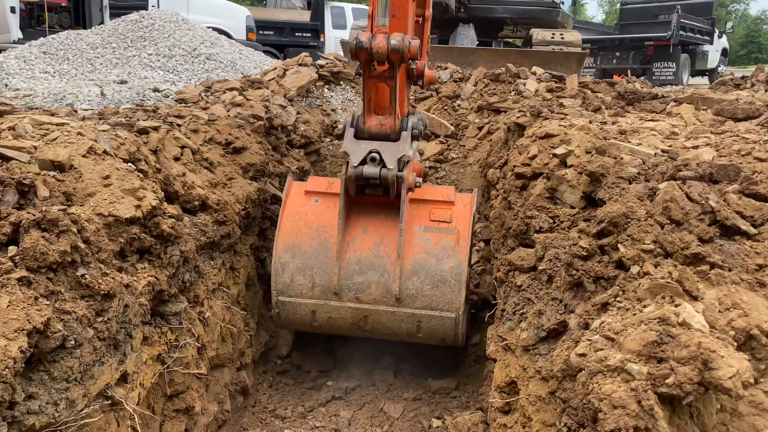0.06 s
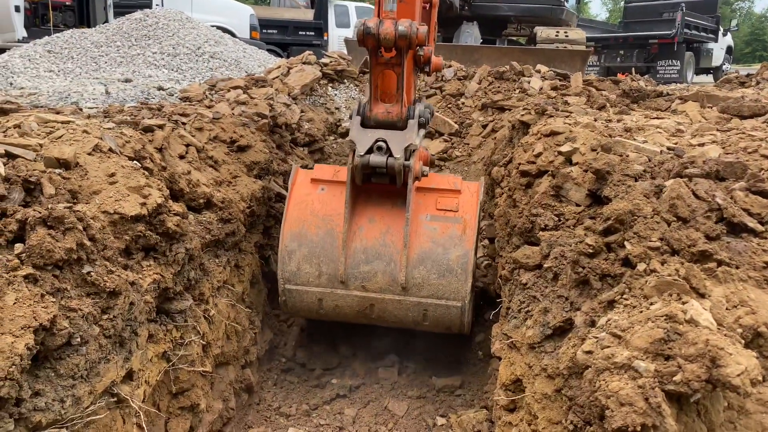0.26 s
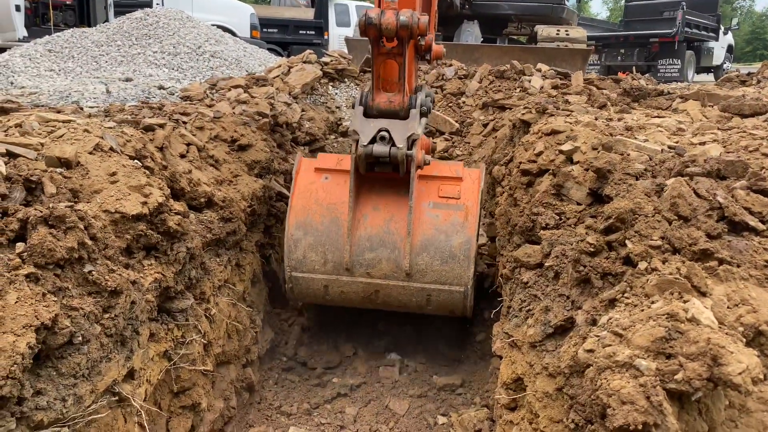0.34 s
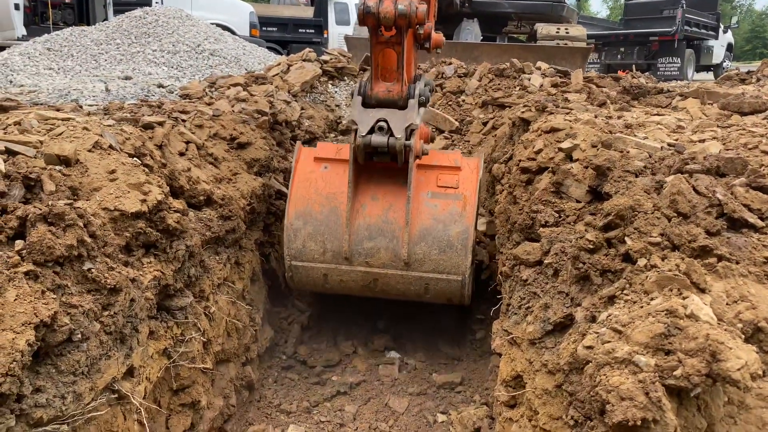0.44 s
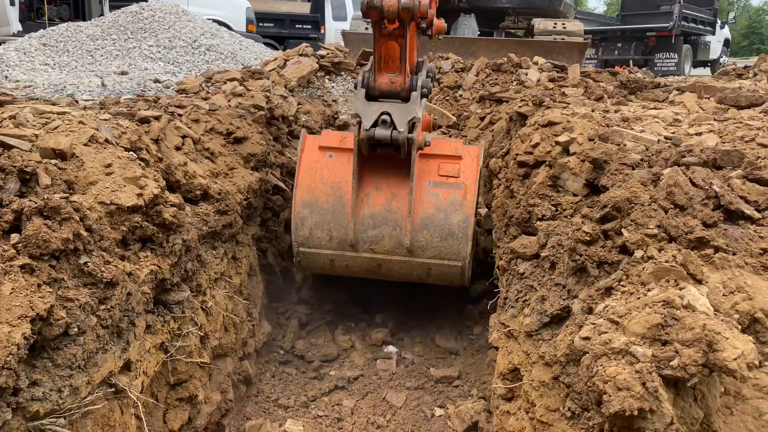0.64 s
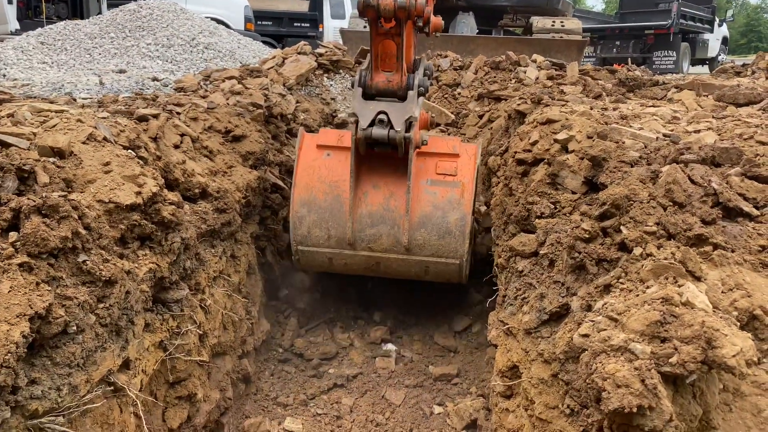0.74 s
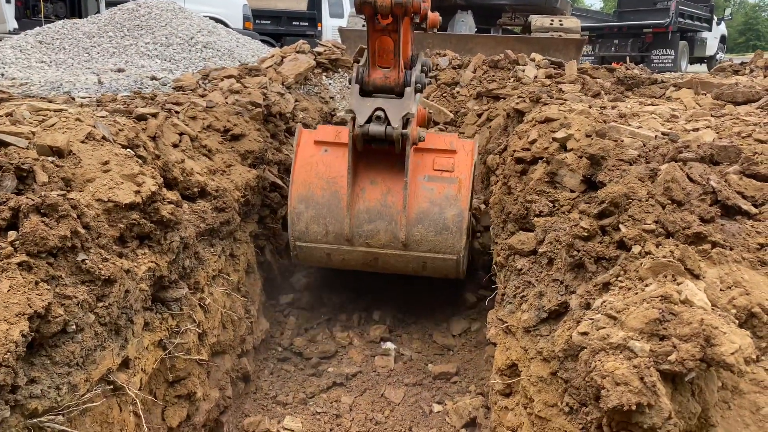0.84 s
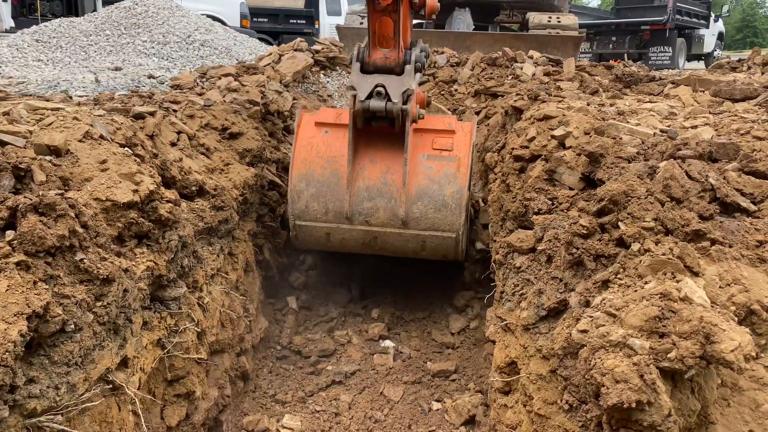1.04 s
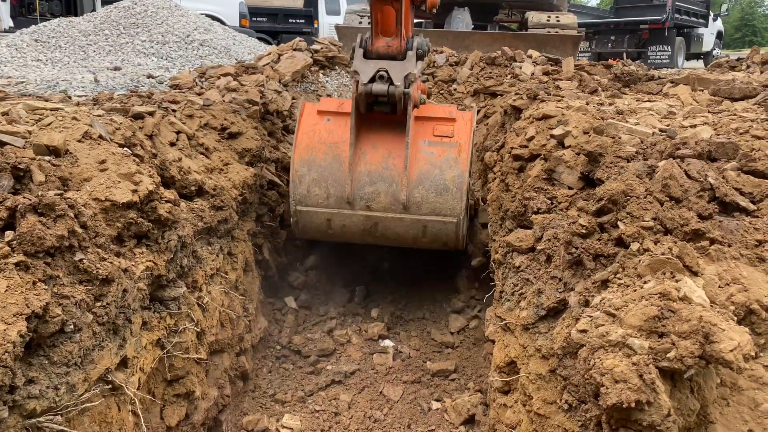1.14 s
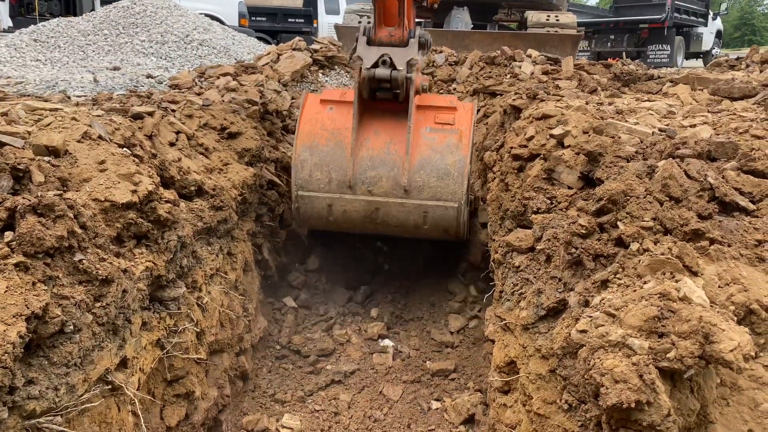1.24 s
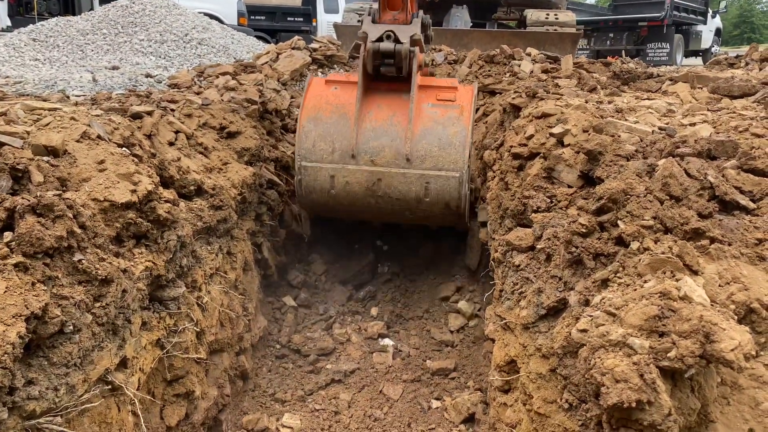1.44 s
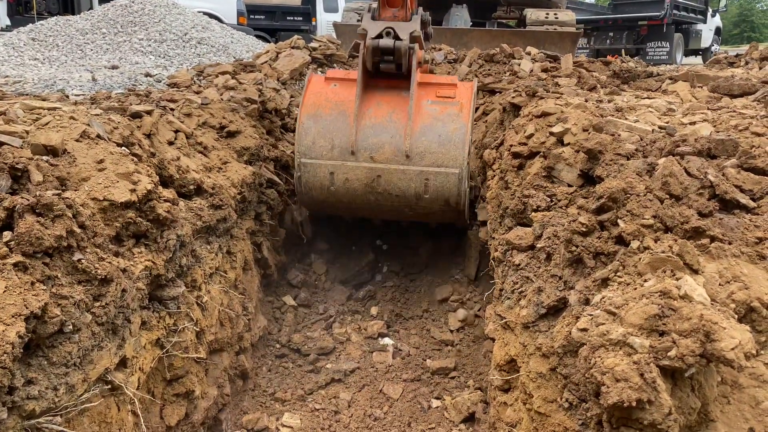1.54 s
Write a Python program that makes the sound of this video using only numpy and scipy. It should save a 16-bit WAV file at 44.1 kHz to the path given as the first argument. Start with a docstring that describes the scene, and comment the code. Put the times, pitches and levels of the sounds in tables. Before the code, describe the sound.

A steel digger bucket grinds briefly against rocky earth over a low engine rumble.

```python
"""Excavator bucket in a rocky trench

A steel bucket lifts along the trench wall. Stones crack against it in showers of tiny fractures,
then it grinds over rock for a third of a second and rings. Soft clods thud down around it, and a
few late knocks follow. Behind it the diesel runs steadily: a low firing tone, rumble and clatter,
a hollow drone and a thin hydraulic whine."""
import sys
import numpy as np
from scipy import signal
from scipy.fft import rfft, irfft, next_fast_len
from scipy.io import wavfile

SR = 44100
rng = np.random.default_rng(int(sys.argv[2]) if len(sys.argv) > 2 else 0)


def generate_wav(sig):
    """Save sig (samples, or channels by samples) to the path in sys.argv[1] as 16-bit PCM at SR."""
    pcm = np.round(np.clip(np.atleast_2d(sig).T, -1, 1) * 32767).astype(np.int16)
    wavfile.write(sys.argv[1], SR, pcm)


N = 70560
TIME = np.arange(N) / SR

# Stone hits. Each row: start in seconds, decay in seconds, share landing on steel from 0 to 1,
# then thud, body, knock, crack and grit in dB per octave.
STONE_HITS = [(.152, 0.0055, 0.1, -20, -34, -23, -26, -20), (.23, 0.01, .05, -23.5, -27, -24, -16, -30),
              (.269, 0.022, 0.04, -36, -23.5, -23.5, -23, -25),
              (0.288, 0.016, 0, -17, -25, -20.5, -12.5, -32.5),
              (0.344, 0.007, 0.07, -14, -13.5, -38, -39, -48),
              (0.363, 0.0079, 0.95, -14.5, -27, -12.5, -20.5, -44),
              (.392, 0.011, 1.0, -20, -15.5, -13.5, -36, -15.5),
              (.438, 0.021, 0.97, -39, -19, -20, -20, -33), (0.463, 0.011, 0.87, -29, -21, -19.5, -29, -27),
              (0.533, 0.011, 0.97, -26, -18.5, -29, -28.5, -39),
              (.551, 0.012, 0, -18, -64, -13, -30.5, -41), (0.598, 0.011, .2, -23.5, -54, -18.5, -35, -50),
              (.71, 0.0074, 0.3, -41, -40, -32.5, -39, -50),
              (1.304, 0.008, 0.15, -27, -29.5, -54, -74, -61),
              (1.523, 0.017, 0, -37.5, -33, -38.5, -42, -45),
              (1.57, 0.0055, 0, -31.5, -33.5, -30.5, -32, -33)]
# Where thud, body, knock, crack and grit sit, in Hz.
HIT_BANDS_HZ = [130, 420, 1250, 2500, 6500]
# The ring of steel and of rock. Each row: pitch in Hz, width in Hz, relative level in dB.
BUCKET_MODES = [(217.4, 12.4, -13.5), (403.7, 18.7, -5.5), (427.5, 13, -11.5), (506.5, 28, -12.5),
                (728, 7.9, -8), (888, 9.6, -14.5), (949.5, 21.5, -2), (1217, 18, -13), (1396, 54, -15),
                (1551, 36, -10), (1924, 36, -34), (2454, 25, -11.5), (4926, 170, -6.5), (6380, 48, -7),
                (7460, 41, -11.5)]
ROCK_MODES = [(1096, 22, -15), (1750, 13, -10.5), (2360, 28, -11), (2485, 27, -14.5)]
# The scrape's swell. Each row: time in seconds, then low grind, mid rasp and high grit in dB.
SCRAPE_ENVELOPE = [(.14, -62, -44.5, -58), (0.169, -25, -47, -39), (.22, -32, -49, -64),
                   (0.278, -22.5, -18.5, -31), (.352, -22.5, -29.5, -31.5), (.4, -20, -23, -36),
                   (0.483, -25.5, -23, -31), (0.559, -23, -32.5, -58.5), (.62, -36, -41.5, -47),
                   (.67, -42, -63, -72), (.76, -43.5, -60, -58)]
# Tone of the scrape's layers and of a clod. Each row: frequency in Hz, relative dB per octave.
GRIND_TONE = [(40, -37.5), (75, 0.5), (115, 5), (160, -22.5), (250, 2), (420, -2.5), (600, -21.5),
              (1000, -47.5)]
RASP_TONE = [(400, -36), (700, -0.5), (1000, -2.5), (1600, 1), (2500, 3), (3500, -21), (6000, -51)]
GRIT_TONE = [(2000, -24), (3600, -2), (5000, -8), (7000, 9), (8500, -7.5), (10500, -1.5), (12000, -57),
             (15000, -34)]
CLOD_TONE = [(50, -22.5), (110, -1), (200, 1), (330, 0), (480, -18.5), (1000, -10.5), (3000, -14.5),
             (10000, -43)]
# Clods landing. Each row: start in seconds, level in dB.
CLOD_FALLS = [(.008, -32), (0.063, -36), (0.151, -25.5), (0.173, -29.5), (.195, -26.5), (0.574, -27),
              (.628, -34.5), (0.724, -36), (0.786, -37.5), (.86, -33), (0.927, -28.5), (.962, -32.5),
              (1.088, -36.5), (1.173, -33.5), (1.228, -39)]
# Gaps between the resonances of bucket and trench. Each row: frequency in Hz, gain in dB.
HOLLOWS_EQ = [(130, 0), (160, -5.5), (210, 0.5), (520, -2), (620, -4.5), (710, 0), (790, -1.5), (930, 0),
              (1190, 2), (1280, -6), (1400, 3), (2000, -2), (2130, -3), (2300, -0.5)]
# Stereo images. Each row: frequency in Hz, left minus right in dB, side against mid in dB.
BUCKET_IMAGE = [(100, 1, -19), (223, 3.5, -21), (400, 0.5, -28), (744, 5.5, -13.5), (1390, 5, -6.5),
                (2560, 0.5, -10), (3900, 2.5, -2.5), (4630, 9, 1), (6960, 8.5, -7), (11400, -8, -3.5)]
ENGINE_IMAGE = [(30, 0.5, -0.5), (106, -0.5, 6), (330, -1.5, -4), (880, 3, -2.5), (1850, 6, 4.5),
                (5000, 5.5, -3.5), (9700, 0.5, -4)]
# Level rides of the firing tone and the drone. Each row: time in seconds, level in dB.
FIRING_ENVELOPE = [(0, -31), (.15, -32), (.45, -35.5), (.62, -48), (.7, -32), (.86, -34.5), (.92, -36),
                   (1.01, -37), (1.08, -34.5), (1.35, -30), (1.6, -33.5)]
DRONE_ENVELOPE = [(0, -33.5), (.12, -46.5), (.7, -38.5), (.86, -35.5), (.97, -32.5), (1.04, -37.5),
                  (1.3, -48), (1.6, -60)]
# Tone of the engine's rumble and fan. Each row: frequency in Hz, relative gain in dB.
RUMBLE_EQ = [(25, -10), (40, -8), (60, 3.5), (90, -1), (120, -6.5), (170, -6.5), (250, -12), (340, -12),
             (480, -27.5), (700, -20), (950, -20.5), (1300, -25), (1900, -23), (3200, -30), (5000, -31),
             (8000, -41), (10800, -32), (12000, -77.5), (15000, -49)]
# Hydraulic whines. Each row: pitch in Hz, width in Hz, level in dB.
HYDRAULIC_WHINES = [(1000, 23, -55.5), (1884, 14, -53), (2435, 40, -62), (4980, 110, -59.5),
                    (6510, 80, -61)]

HIT_ATTACK_S, HIT_HOLD_S, HIT_RING_DB = 0.00071, 0.003, -14
HIT_BASS_DB, HIT_DIP_DB, HIT_TOP_DB = -23.5, -8, -10.5   # against the neighbouring bands
CRUMBS_PER_S, CRUMB_SPREAD_DB = 5000, 1
SCRAPE_DB, GRAINS_PER_S, GRAIN_SPREAD_DB = -1, 3500, 3
JUDDER_DB, JUDDER_HZ = 3, 45.04
STEEL_BITES_S, GLANCING_DB = 0.362, -6.5   # the scrape rings the bucket less until the steel bites
CLOD_ATTACK_S, CLOD_DECAY_S = 0.0046, 0.015
TRENCH_DB, TRENCH_T60_S = -8.5, 0.2
FIRING_HZ, FIRING_SIDE_GAIN = 63.3, 0.49
RUMBLE_DB, CLATTER_DEPTH = -37, 0.13
DRONE_HZ, DRONE_WIDTH_HZ = 321, 39
LEFT_LEAD_S, CUTOFF_HZ = 0.00007, 15300


def stone_hits():
    """Each stone breaks in a quick, dying shower of fractures and sets the bucket or rock ringing."""
    on_rock, on_steel = 0, 0
    hz = [45, *HIT_BANDS_HZ[:4], 3800, HIT_BANDS_HZ[4], 10500, 12500]
    for start, decay_s, steel_share, thud, body, knock, crack, grit in STONE_HITS:
        age = TIME - start
        force = np.clip(age / HIT_ATTACK_S, 0, 1) * np.exp(-np.maximum(age - HIT_HOLD_S, 0) / decay_s)
        shower = unit_power(grains(CRUMBS_PER_S, CRUMB_SPREAD_DB) * force) * rms(force)
        dip = (crack + grit) / 2 + HIT_DIP_DB
        db = [thud + HIT_BASS_DB, thud, body, knock, crack, dip,
              grit, grit + HIT_TOP_DB, grit + 2 * HIT_TOP_DB]
        hit = per_octave(shower, hz, np.array(db))
        on_rock += (1 - steel_share) * hit
        on_steel += steel_share * hit
    ringing = 0
    for hits, modes in ((on_steel, BUCKET_MODES), (on_rock, ROCK_MODES)):
        for mode_hz, width_hz, db in modes:
            ringing += from_db(HIT_RING_DB + db) * resonate(hits, mode_hz, width_hz)
    return on_rock + on_steel + ringing


def bucket_scrape():
    """Steel judders over rock: dense grains, heard directly and through the bucket's modes."""
    times, *levels = np.transpose(SCRAPE_ENVELOPE)
    judder_db = JUDDER_DB * drift(JUDDER_HZ)
    layers = [(GRIND_TONE, 0, 600), (RASP_TONE, 600, 3000), (GRIT_TONE, 3000, SR)]
    out = 0
    for level_db, (tone, low_hz, high_hz) in zip(levels, layers):
        force = from_db(np.interp(TIME, times, level_db) + judder_db)
        texture = per_octave(grains(GRAINS_PER_S, GRAIN_SPREAD_DB), *np.transpose(tone))
        out += from_db(SCRAPE_DB) * force * unit_power(texture)
        bite = from_db(GLANCING_DB * (TIME < STEEL_BITES_S))
        drive = force * bite * grains(GRAINS_PER_S, GRAIN_SPREAD_DB)
        for hz, width_hz, db in BUCKET_MODES:
            if low_hz <= hz < high_hz:
                out += from_db(db) * rms(force) * unit_power(resonate(drive, hz, width_hz))
    return out


def clods():
    """Lumps of soft earth land with dull, crumbly thuds."""
    force = 0
    for start, db in CLOD_FALLS:
        attack = np.clip((TIME - start) / CLOD_ATTACK_S, 0, 1)
        decay = np.exp(-np.maximum(TIME - start - CLOD_ATTACK_S, 0) / CLOD_DECAY_S)
        force += from_db(db) * attack * decay
    return per_octave(force * grains(CRUMBS_PER_S, CRUMB_SPREAD_DB), *np.transpose(CLOD_TONE))


def trench(x):
    """The earth walls add a short scatter, different for each side, after a 6 ms pre-delay."""
    age = TIME[:SR // 3]
    scatter = rng.standard_normal((2, len(age))) * from_db(-60 * age / TRENCH_T60_S) * (age > 0.006)
    scatter /= np.sqrt(np.sum(scatter ** 2, axis=1, keepdims=True))
    return x + from_db(TRENCH_DB) * signal.fftconvolve(x, scatter, axes=1)[:, :N]


def diesel():
    """A wavering firing tone, rumble that pulses with each firing, and a hollow drone."""
    phase = 2 * np.pi * FIRING_HZ * TIME + 0.31 * drift(3.57)
    firing_db = np.interp(TIME, *np.transpose(FIRING_ENVELOPE))
    mid = np.sin(phase) * from_db(firing_db + drift(7.44))
    side = FIRING_SIDE_GAIN * np.cos(phase) * from_db(firing_db + drift(7))
    firing = np.sqrt(2) * np.array([mid, side])
    clatter = rng.standard_normal((2, N)) * (1 + CLATTER_DEPTH * np.sin(phase)) * from_db(drift(18))
    rumble = from_db(RUMBLE_DB) * unit_power(colour(clatter, *np.transpose(RUMBLE_EQ)))
    drone_db = np.interp(TIME, *np.transpose(DRONE_ENVELOPE))
    drone = from_db(drone_db) * pitched_noise(DRONE_HZ, DRONE_WIDTH_HZ)
    return firing + rumble + drone


def hydraulics():
    """The hydraulics whine in thin, steady bands of noise."""
    return sum(from_db(db) * pitched_noise(hz, width_hz) for hz, width_hz, db in HYDRAULIC_WHINES)


def from_db(db):
    """Decibels to gain."""
    return 10 ** (np.asarray(db) / 20)


def rms(x):
    """Average level, never quite zero."""
    return np.sqrt(np.mean(x ** 2) + 1e-20)


def unit_power(x):
    """Scale to an RMS of 1."""
    return x / rms(x)


def colour(x, hz, db):
    """Minimum-phase EQ through the points (Hz, dB), so nothing rings ahead of a hit."""
    size = next_fast_len(N + SR // 4, True) // 2 * 2
    bins_hz = np.maximum(np.arange(size // 2 + 1) * SR / size, 1)
    gain = from_db(np.interp(np.log(bins_hz), np.log(hz), db))
    cepstrum = irfft(np.log(gain))
    cepstrum[1:size // 2] *= 2
    cepstrum[size // 2 + 1:] = 0
    return irfft(rfft(x, size) * np.exp(rfft(cepstrum)))[..., :N]


def per_octave(x, hz, db):
    """Give white sound of unit power these levels per octave."""
    return colour(x, hz, db + 10 * np.log10(SR / np.sqrt(2) / np.asarray(hz)))


def drift(rate_hz):
    """Smooth random wander of spread 1."""
    knots = rng.standard_normal(2000)
    return unit_power(np.interp(TIME * 2 * rate_hz, np.arange(len(knots)), knots))


def resonate(x, hz, width_hz):
    """One resonance; white input keeps its power."""
    radius = np.exp(-np.pi * width_hz / SR)
    feedforward = np.sqrt((1 - radius ** 2) / 2) * np.array([1, 0, -1])
    feedback = [1, -2 * radius * np.cos(2 * np.pi * hz / SR), radius ** 2]
    return signal.lfilter(feedforward, feedback, x + 1e-18)


def pitched_noise(hz, width_hz):
    """A narrow band of noise, as mid and side, of unit power."""
    return unit_power(resonate(rng.standard_normal((2, N)), hz, width_hz))


def grains(per_s, spread_db):
    """Random clicks of uneven size, as mid and side, of unit power."""
    sizes = from_db(spread_db * np.minimum(rng.exponential(1, (2, N)), 4))
    clicks = rng.random((2, N)) < per_s / SR
    return unit_power(clicks * sizes * rng.choice([-1, 1], (2, N)))


def place(pair, image):
    """Turn mid and side into left and right, with width and balance by frequency."""
    hz, balance_db, side_db = np.transpose(image)
    mid, side = pair[0], colour(pair[1], hz, side_db)
    centre_db = 20 * np.log10((from_db(balance_db / 2) + from_db(-balance_db / 2)) / 2)
    left = colour(mid + side, hz, balance_db / 2 - centre_db)
    right = colour(mid - side, hz, -balance_db / 2 - centre_db)
    return np.array([left, right])


def scene():
    """The bucket in its trench, a little to the left, over the bed of engine and hydraulics."""
    digging = colour(stone_hits() + bucket_scrape() + clods(), *np.transpose(HOLLOWS_EQ))
    foreground = trench(place(digging, BUCKET_IMAGE))
    bed = place(diesel() + hydraulics(), ENGINE_IMAGE)
    left, right = foreground + bed
    return np.array([left, np.interp(TIME - LEFT_LEAD_S, TIME, right)])


def record(dry):
    """The microphone dulls the highest treble and rounds the peaks; a steep low-pass cuts the top."""
    dull = colour(dry, hz=[10500, 11800, 14000], db=[0, -10, -4])
    rounded = 1.4 * np.tanh(dull / 1.4)
    low_pass = signal.ellip(10, 0.2, 70, CUTOFF_HZ, fs=SR, output="sos")
    return signal.sosfiltfilt(low_pass, rounded)


dry = scene()
out = record(dry)
generate_wav(out)
```